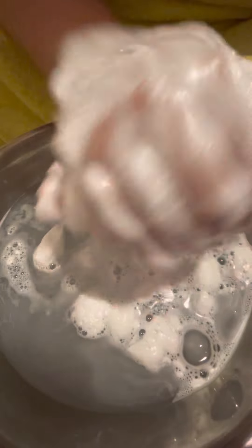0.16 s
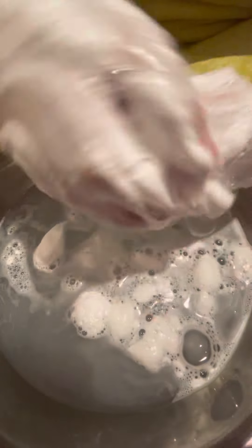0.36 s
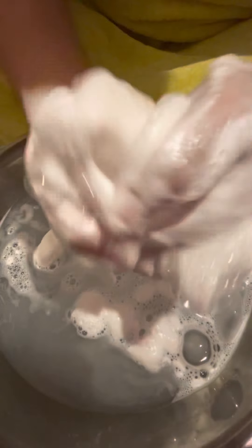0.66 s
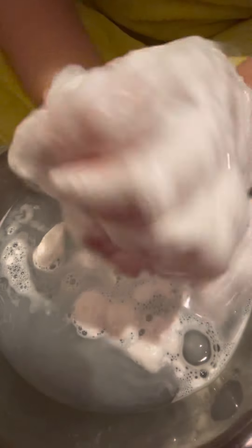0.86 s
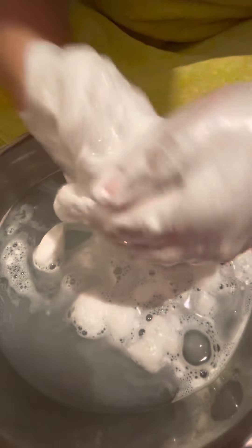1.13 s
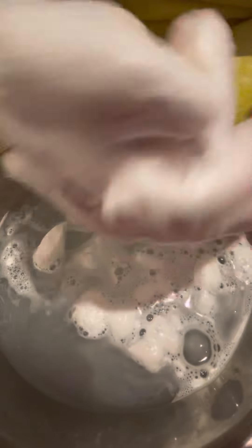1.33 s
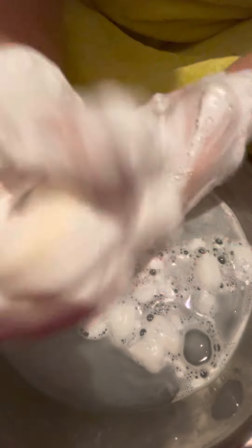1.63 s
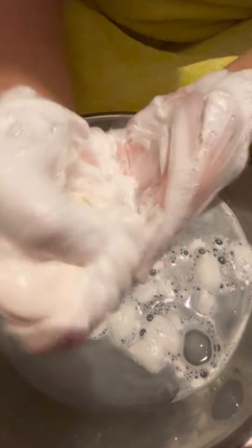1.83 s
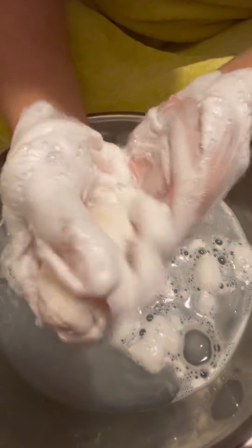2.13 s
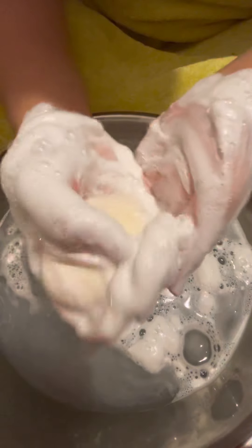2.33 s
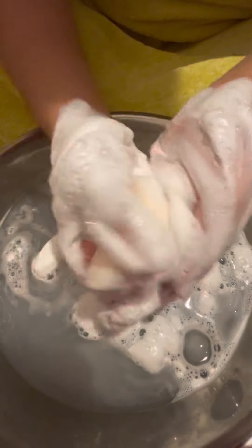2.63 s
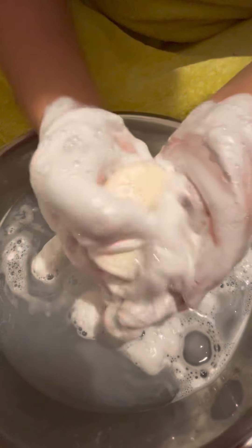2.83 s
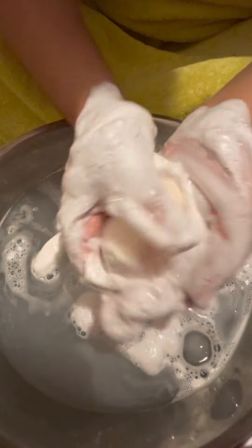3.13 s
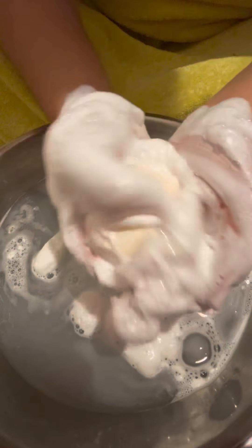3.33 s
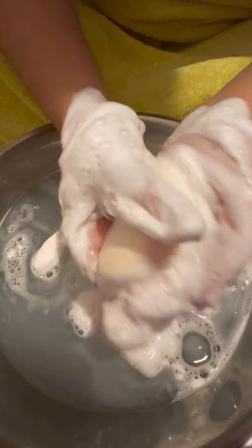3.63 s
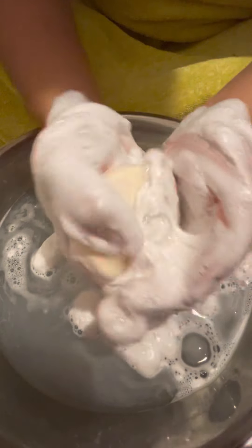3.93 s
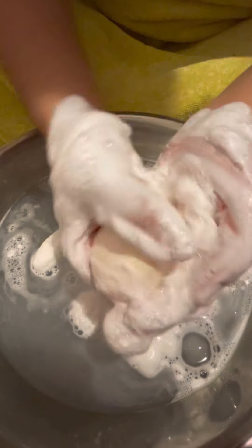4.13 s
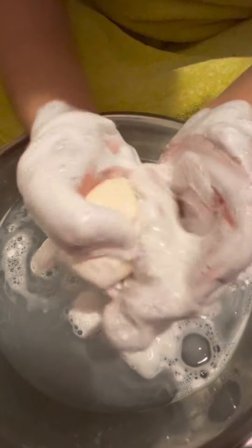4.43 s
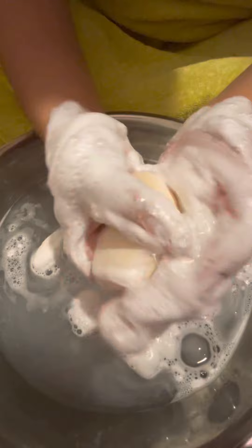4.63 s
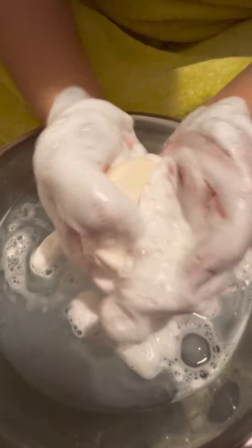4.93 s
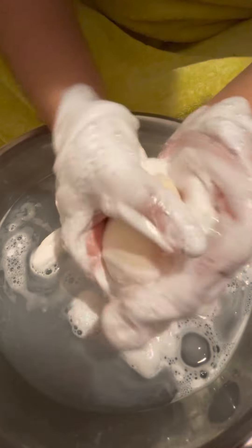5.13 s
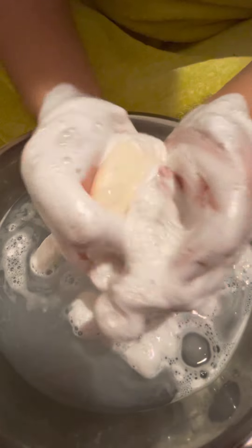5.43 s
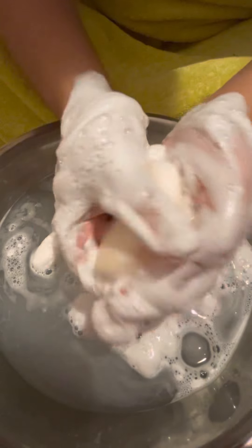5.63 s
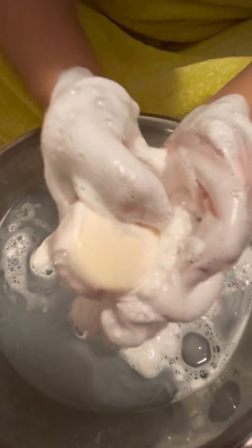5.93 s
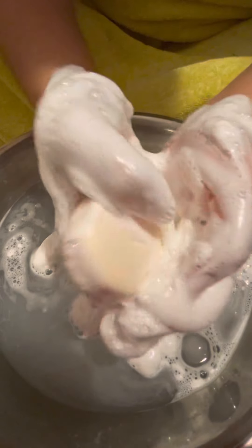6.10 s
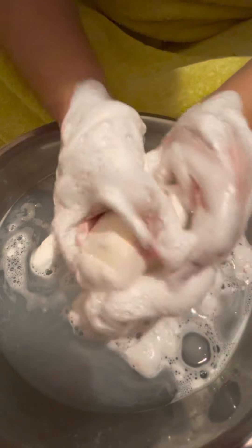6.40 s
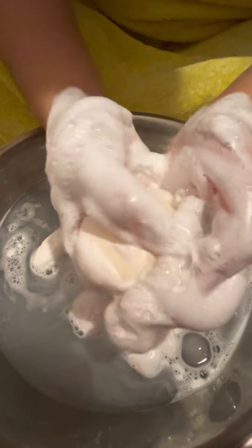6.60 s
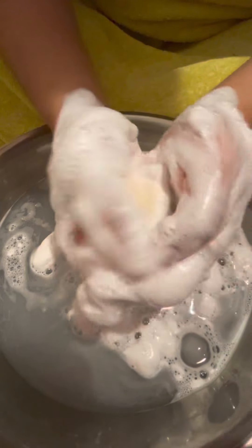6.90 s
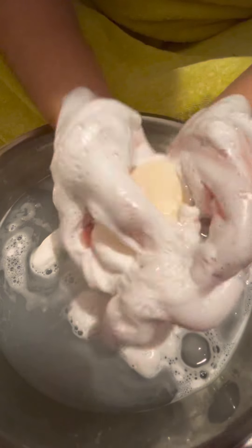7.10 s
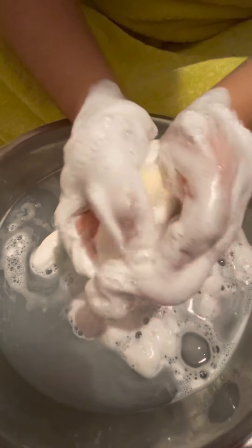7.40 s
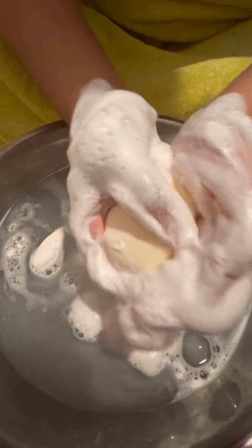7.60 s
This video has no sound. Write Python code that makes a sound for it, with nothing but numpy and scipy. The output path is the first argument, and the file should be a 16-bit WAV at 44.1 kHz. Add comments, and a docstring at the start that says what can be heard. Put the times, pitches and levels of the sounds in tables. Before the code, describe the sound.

Very close to the microphone, two lathered hands knead a wet bar of soap over a metal bowl. Sparse, faint bubble pops come first; from about two and a half seconds, hollow gulps and wet squelches grow stronger, with crisp snaps in irregular clusters. Fine foam crackle whispers underneath, the bowl adds only a very short reflection, and a soft low rumble fills the quiet room.

```python
"""In a quiet room, close to a phone with two microphone ports, two hands knead a wet bar of soap.
Collapsing air pockets snap as falling sine bursts, and the hollow between the palms gulps as a brief resonance.
Hard squeezes are volleys of bursts with a spit of noise; foam is a random crackle over a noise whisper.
A steel bowl below answers as a short tail of decaying noise.
A low rumble is noise with wavering bands, and soft sinking tones murmur."""
import sys
import numpy as np
from scipy import signal
from scipy.fft import rfft, irfft, next_fast_len
from scipy.io import wavfile
from scipy.ndimage import uniform_filter1d, map_coordinates

SR = 44100
rng = np.random.default_rng(int(sys.argv[2]) if len(sys.argv) > 2 else 0)


def transcribe(u):
    """Save the signal u as a 16-bit wav file named by the first command-line argument.

    u: samples, shape (n,) or (channels, n), limited to [-1, 1]; the rate is SR.
    q: integer samples, one column per channel.
    """
    v = np.clip(np.atleast_2d(u).T, -1, 1)
    q = np.round(v * 32767).astype(np.int16)
    wavfile.write(sys.argv[1], SR, q)


N = 341775

# air pockets bursting: peak_s, collapse_db, starting_pitch_hz, film_spray_db
POCKET_BURSTS = [(0.142, -35, 2900, -41.5), (0.18, -38, 1980.0, -61.5), (0.265, -42.5, 1240, -75),
                 (0.362, -44, 1297, -55.5), (0.483, -45.5, 1930, -53), (0.63, -42, 2890.0, -59),
                 (0.73, -41, 2100, -40), (0.7469, -32.5, 2480, -42), (0.994, -39.5, 2860, -57),
                 (1.073, -40.5, 2470, -84), (1.146, -41, 2400, -79), (1.255, -34, 3090, -50),
                 (1.302, -41.5, 4000, -48.5), (1.36, -40, 2950, -61), (1.474, -44.5, 3950, -54),
                 (1.813, -36, 1550, -57.5), (2.116, -45.5, 3080, -43.5), (2.24, -44, 1720, -56),
                 (2.253, -37.5, 1610, -53), (2.276, -38, 1770, -65), (2.663, -34.5, 2520, -78.5),
                 (2.841, -23.5, 2010, -71), (2.919, -23.5, 2610, -27.5), (2.968, -33, 3100, -56.5),
                 (3.106, -38, 2700, -44.5), (3.17, -35.5, 3320, -38.5), (3.363, -33, 2360.0, -27.5),
                 (3.413, -37, 3000, -41), (3.449, -41, 2600.0, -50.5), (3.469, -45, 2650, -52),
                 (3.717, -30.5, 1700.0, -49.5), (4.148, -39.5, 3880, -39.5), (4.303, -41, 4400, -48.5),
                 (4.4965, -39.5, 1860, -55), (4.618, -32.5, 2680, -35), (4.629, -34, 2400, -45),
                 (4.718, -42, 3000, -84), (4.81, -27.5, 2880, -38.5), (4.831, -24, 3180, -32.5),
                 (4.917, -32, 2350, -49.5), (5.119, -27.5, 5330, -44.5), (5.221, -39, 1290, -55.5),
                 (5.284, -34, 2260, -54), (5.306, -33.5, 2210.0, -35), (5.463, -30.5, 3320, -33.5),
                 (5.616, -19, 2840, -47.5), (5.636, -29.5, 2480, -67.5), (5.677, -38.5, 2900, -48),
                 (5.695, -36.5, 4200, -43), (5.867, -45.5, 2880, -73), (5.894, -31, 2060, -73),
                 (6.135, -35, 1820, -70), (6.302, -35.5, 1990, -60), (6.453, -40, 1570, -61),
                 (6.592, -39, 3870, -47), (6.708, -29, 3680, -31), (6.787, -25, 4420, -29),
                 (6.875, -29.5, 4350, -41.5), (6.995, -29, 2620, -79), (7.198, -26.5, 2460, -33.5),
                 (7.254, -26, 2900, -46.5), (7.305, -37.5, 3300, -35.5), (7.329, -31.5, 2480, -50),
                 (7.361, -35.5, 3730, -40.5), (7.452, -26, 2330, -40), (7.627, -38.5, 4670, -47),
                 (7.675, -37, 2570, -57), (7.706, -19.5, 3050, -33)]
# the hollow between the palms opening: peak_s, peak_db, starting_pitch_hz
PALM_GULPS = [(0.72, -36.5, 510), (0.7334, -30, 589.5), (0.7534, -34, 600), (1.85, -43.5, 565),
              (2.118, -44, 720), (2.4515, -29.5, 630), (2.4659, -21, 626), (2.492, -23.5, 670),
              (2.816, -35, 505), (2.833, -26.5, 620), (2.8438, -24.5, 526), (2.9223, -21.5, 582),
              (3.367, -30.5, 454), (3.409, -33.5, 630), (3.7195, -37.5, 560), (4.393, -31.5, 486),
              (4.8133, -29, 580), (4.833, -28, 540), (5.326, -28.5, 534), (5.336, -25.5, 595),
              (5.345, -32, 650), (6.268, -42, 666), (7.184, -29, 560), (7.2, -30, 448),
              (7.2104, -29.5, 750), (7.222, -36, 427), (7.455, -35.5, 346), (7.708, -26, 587.5)]
# hard squeezes: start_s, length_s, and the mean levels of the snaps and the spit: body_db, spit_db
HARD_SQUEEZES = [(0.096, 0.026, -53.5, -62), (0.546, 0.03, -54.5, -61), (0.715, .059, -50.5, -76),
                 (1.83, 0.023, -52.5, -59.5), (2.414, 0.12, -50.5, -69), (2.442, 0.01, -31.5, -45),
                 (2.459, 0.0071, -22.5, -40.5), (2.469, 0.011, -23, -48), (2.478, 0.031, -45, -56.5),
                 (2.795, 0.056, -51, -65.5), (2.887, 0.015, -44.5, -93), (3.363, 0.033, -54, -41.5),
                 (3.396, 0.013, -43.5, -56.5), (3.823, 0.025, -62, -65), (4.358, 0.078, -46.5, -49.5),
                 (4.788, 0.067, -46.5, -65), (5.321, 0.024, -31.5, -36.5), (5.746, .014, -43.5, -52.5),
                 (6.765, 0.036, -48.5, -46), (7.164, 0.0281, -49, -70), (7.192, 0.035, -44, -46.5),
                 (7.444, .016, -41.5, -50), (7.697, 0.051, -43, -53)]
# bright snaps of single bubbles: peak_s, reference_db (snap and spray lie below it)
SINGLE_SNAPS = [(0.6569, -38), (0.9627, -49), (1.1666, -64), (1.216, -49), (1.3906, -48.5), (2.0842, -39.5),
                (2.7556, -54.5), (2.7924, -40), (3.035, -45.5), (3.0824, -44), (3.1469, -35),
                (3.1844, -42.5), (3.2487, -51), (3.5871, -48.5), (3.6431, -47), (3.6625, -35),
                (3.6858, -41), (3.9489, -46.5), (3.9939, -50.5), (4.2768, -52), (4.3145, -47.5),
                (4.563, -40), (4.596, -39), (4.7501, -41.5), (5.145, -37.5), (5.8404, -50.5),
                (6.1399, -41.5), (6.2857, -45), (6.5091, -41), (7.6102, -46)]
# course of the kneading, which guides whisper and crackle: time_s, reference_db
KNEADING = [(0, -73), (0.3, -80), (0.71, -72), (1.25, -75), (1.7, -86), (2.3, -78), (3, -69), (3.4, -79),
            (4.08, -84), (4.5, -72), (5.25, -78), (5.55, -68), (5.76, -68), (5.93, -86), (6.5, -81.5),
            (6.85, -68), (7.35, -68), (7.5, -77.5)]
# relative spectrum of the foam's whisper: frequency_hz, level_db
WHISPER_SPECTRUM = [(250, -20), (600, -1), (2000, 0), (4000, -7), (6400, -7), (8200, -16), (10800, -9),
                    (12500, -37), (15000, -52)]
# relative spectrum of air spat through foam and of torn films: frequency_hz, level_db
SPIT_SPECTRUM = [(1500, -16), (3500, -4), (6000, -1), (8200, -3), (10800, 2), (12000, -11), (13200, -30),
                 (15800, -54)]
# decay of the steel bowl's answer: frequency_hz, t60_s
BOWL_DECAY = [(400, 0.1), (1800, 0.025), (5000, 0.034), (12000, 0.023)]
# course of the room's rumble: time_s, level_db
RUMBLE_COURSE = [(0, -61.5), (0.8, -61), (2.1, -61), (3.28, -61.5), (4.1, -68.5), (5.35, -53.5), (5.9, -58),
                 (6.3, -62.5), (7.08, -56), (7.75, -59)]
# relative spectrum of the rumble: frequency_hz, level_db
RUMBLE_SPECTRUM = [(30, -43), (42, -4), (58, 3.5), (75, -4.5), (120, -12), (200, -13.5), (330, -28),
                   (700, -38.5), (1200, -120)]
# soft sinking tones, before their random wavering: start_s, length_s, starting_pitch_hz, level_db
SOFT_TONES = [(2.516, 0.3, 424, -76.5), (5.498, .48, 178, -66.5)]
# phase of the left port ahead of the right: frequency_hz, lead_rad
PORT_LEAD = [(0, 0), (520, -.1), (860, .6), (1500, .1), (4400, 1.4), (5250, 4.6), (5600, 6), (8010, 9.1),
             (9600, 9.4), (12000, 12.5), (14000, 12.8)]
# level of the left port over the right: frequency_hz, lean_db
PORT_LEAN = [(100, -.6), (300, -3.8), (600, -5.5), (1200, 1.2), (2800, -2), (9000, 0)]

KNOCK_DB, KNOCK_CAP_DB = -15, -29.5  # mean knock relative to its pop; louder pops knock no harder than the cap
CRACKLE_DB = -70.5  # small bubbles at the mean kneading level
CRACKLE_GROWTH, CRACKLE_CROWDING = 0.38, 0.92  # dB louder and dB denser per dB of kneading
BAND_LIMIT_HZ = 15700


def amp(db):
    """Level and amplitude: 20 dB is a factor of ten."""
    return 10 ** (np.asarray(db) / 20)


def unit(x):
    """Normalisation: the whole array is brought to an rms of 1."""
    return x / np.sqrt(np.mean(x ** 2) + 1e-20)


def along(points, hz):
    """Logarithmic frequency scale: the second column interpolated at hz."""
    f, v = np.transpose(points)
    return np.interp(np.log(hz + 1), np.log(f + 1), v)


def curve(rows):
    """Linear interpolation: one value per sample from (s, value) rows."""
    return np.interp(np.arange(N) / SR, *np.transpose(rows))


def wobble(rate_hz):
    """Slow random modulation: a smooth curve through rate_hz random knots a second."""
    knots = rng.standard_normal(int(N * rate_hz / SR) + 4)
    return map_coordinates(knots, [np.arange(N) * rate_hz / SR])


def filtered(x, response):
    """Linear filtering: the spectrum of x times a complex response of frequency."""
    m = next_fast_len(N + 8192)
    hz = np.fft.rfftfreq(m, 1 / SR)
    return irfft(rfft(x, m) * response(hz), m)[..., :N]


def hiss(spectrum, channels=1):
    """Coloured noise: white noise shaped by a spectrum, with an rms of 1."""
    white = rng.standard_normal((channels, N))
    return unit(filtered(white, lambda hz: amp(along(spectrum, hz))))


def bubbles(peak_s, db, hz, cycles, fall, size):
    """Bubble oscillation: sine bursts swell for some cycles and fade; pitch sinks towards (1 - fall) * hz."""
    u = hz[:, None] * np.arange(size) / SR / cycles  # time in units of the rise
    phase = cycles * (u * (1 - fall) + fall * 2 * (1 - np.exp(-u / 2)))
    envelope = (u * np.exp(1 - u)) ** 2
    wave = np.sin(2 * np.pi * phase) * amp(db)[:, None] * envelope
    start = np.maximum((peak_s - cycles / hz) * SR, 0).astype(int)
    at = start[:, None] + np.arange(size)
    return np.bincount(at.ravel(), wave.ravel(), N + size)[:N]


def puffs(peak_s, db, rise_s):
    """Turbulent noise: bursts of bright hiss swell for rise_s up to peak_s and fade."""
    u = np.arange(500) / SR / rise_s
    start = np.maximum((peak_s - rise_s) * SR, 0).astype(int)
    kicks = np.bincount(start, amp(db), N)
    envelope = np.convolve(kicks, (u * np.exp(1 - u)) ** 2)[:N]
    return envelope * hiss(SPIT_SPECTRUM)[0]


def pops():
    """Cavity collapse: a falling snap, a neighbour just before or after, film spray and a late palm knock."""
    s, db, hz, spray_db = np.transpose(POCKET_BURSTS)
    chance = rng.standard_normal((len(s), 5))
    snap = bubbles(s, db, hz, cycles=0.92, fall=0.57, size=500)

    beside_s = np.clip(s + 0.003 * chance[:, 2], 0, s[-1])
    beside_db = -10 + 3 * chance[:, 3]  # relative to the pop
    beside_hz = 0.65 * hz * np.exp(0.37 * chance[:, 4])
    neighbour = bubbles(beside_s, db + beside_db, beside_hz, cycles=1.79, fall=0.33, size=500)

    knock_db = KNOCK_DB + np.minimum(db, KNOCK_CAP_DB) + 3 * chance[:, 0]
    knock_hz = 560 * np.exp(0.25 * chance[:, 1])
    knock = bubbles(s + 0.002, knock_db, knock_hz, cycles=1.203, fall=0.021, size=900)

    spray = puffs(s, spray_db, rise_s=0.00097)
    spray += puffs(beside_s, spray_db + beside_db, rise_s=0.0012)
    return snap + neighbour + knock + spray


def gulps():
    """Cavity resonance: the air between the palms rings for a handful of cycles."""
    s, db, hz = np.transpose(PALM_GULPS)
    return bubbles(s, db, hz, cycles=1.14, fall=0.1, size=1600)


def squeezes(count=1300):
    """Forced flow: air driven out between soap and skin gives a dense volley of wet snaps and a lumpy spit."""
    t = np.arange(N) / SR
    body, spit = np.zeros(N), np.zeros(N)
    for s, length, body_db, spit_db in HARD_SQUEEZES:
        onset = np.clip((t - s) / 0.0016, 0, 1)
        release = np.clip((s + length - t) / 0.0022, 0, 1)
        body += amp(body_db) * onset * release
        spit += amp(spit_db) * onset * release

    # snaps fall at random within the time under pressure
    pressed = np.cumsum(body > 0)
    u = rng.random((count, 3))
    snap_s = np.interp(u[:, 0], pressed / pressed[-1], t)
    size_db = -3.5 * np.log(u[:, 1] + 0.077) - 3 * u[:, 2]  # the higher snaps are weaker
    snap_hz = 800 * 5.57 ** u[:, 2]
    volley = bubbles(snap_s, size_db, snap_hz, cycles=0.96, fall=0.12, size=700)

    # wet pockets that ring on and rise
    wet_s = snap_s[::4]
    wet_hz = 520 * 5 ** rng.random(len(wet_s))
    volley += bubbles(wet_s, size_db[::4], wet_hz, cycles=2.5, fall=-0.2, size=1500)
    volley /= np.std(volley[body > 0])

    lumps_db = 3 * wobble(140) + 2.5 * wobble(500)
    return body * amp(3.6 * wobble(90)) * volley + spit * amp(lumps_db) * hiss(SPIT_SPECTRUM)[0]


def ticks():
    """Single-bubble collapse: one short cycle and a thin spray."""
    s, db = np.transpose(SINGLE_SNAPS)
    hz = 3000 * np.exp(0.23 * rng.standard_normal(len(s)))
    snap = bubbles(s, db - 5.5, hz, cycles=1.12, fall=0.33, size=300)
    return snap + puffs(s, db - 2, rise_s=0.0004)


def foam(count=320):
    """Random point process: clumped bubbles break more often in busy kneading, over a whisper of tiny ones."""
    knead_db = curve(KNEADING)
    swing_db = knead_db - knead_db.mean()
    clump = wobble(28)
    chance = np.cumsum(amp(CRACKLE_CROWDING * swing_db + 5 * clump))
    u = rng.random((count, 4))
    s = np.interp(u[:, 0], chance / chance[-1], np.arange(N) / SR)
    db = -4.5 * np.log(u[:, 1] + 0.019)  # many weak bubbles, few strong
    hz = 800 * 6 ** u[:, 2]
    snaps = unit(bubbles(s, db, hz, cycles=1.09, fall=0.5, size=300))
    spray = unit(puffs(s, db + 12 * u[:, 3], rise_s=0.00021))
    crackle = amp(CRACKLE_DB + CRACKLE_GROWTH * swing_db) * (snaps + amp(-0.5) * spray)
    # two independent noises: one joins the hands, the other is added equally to both ports
    whisper = hiss(WHISPER_SPECTRUM, channels=2) * amp(knead_db + 2.5 * clump - 0.5)
    return crackle, whisper


def bowl(x):
    """Reverberant decay: each frequency of the answer dies at its own speed, differently at each port."""
    hz, t, z = signal.stft(rng.standard_normal((2, SR // 5)), SR, nperseg=128)
    decay_db = -60 * t / along(BOWL_DECAY, hz)[:, None]
    tail = signal.istft(z * amp(decay_db), SR, nperseg=128)[1]
    tail /= np.linalg.norm(tail[0])
    delayed = np.pad(x, (90, 0))  # samples, about 2 ms
    return signal.fftconvolve(delayed[None], tail, axes=1)[:, :N]


def rumble():
    """Narrow-band fluctuation: bands of low noise swell and fade, nearly the same at both ports."""
    z = signal.stft(hiss(RUMBLE_SPECTRUM, channels=2), nperseg=4096)[2]
    bands_db = 3.5 * unit(uniform_filter1d(rng.standard_normal(z.shape[1:]), size=8, axis=1))
    mid, side = unit(signal.istft(z * amp(bands_db), nperseg=4096)[1][:, :N])
    side = amp(-12.5) * side
    return amp(curve(RUMBLE_COURSE)) * np.array([mid + side, mid - side])


def murmurs():
    """Frequency and amplitude modulation: random wavering blurs soft tones that sink in pitch."""
    t = np.arange(N) / SR
    out = np.zeros(N)
    for s, length, hz, db in SOFT_TONES:
        u = np.clip((t - s) / length, 0, 1)
        pitch_hz = hz * (1 - 0.07 * u + 0.04 * wobble(130))
        tone = np.sin(2 * np.pi * np.cumsum(pitch_hz) / SR)
        swell = np.sqrt(np.abs(np.sin(np.pi * u))) * (u < 1)
        out += amp(db + 5 * wobble(40)) * swell * tone
    return out


def at_ports(hands):
    """Interaural-style differences: the ports differ in level and phase at each frequency."""
    sides = np.array([[0.5], [-0.5]])  # left and right share each difference

    def response(hz):
        level = amp(sides * along(PORT_LEAN, hz))
        lead = np.exp(1j * sides * np.interp(hz, *np.transpose(PORT_LEAD)))
        dip = 1 - 0.7 * np.exp(-((hz - 820) / 130) ** 2)  # a hollow in the colour above the palms' ring
        return level * lead * dip

    return filtered(hands, response)


def scene():
    """Superposition: the hands at both ports, their answer from the bowl, and the room."""
    crackle, whisper = foam()
    hands = pops() + gulps() + squeezes() + ticks() + crackle + whisper[0]
    near = at_ports(hands) + amp(-9.5) * whisper[1]
    return near + amp(-9) * bowl(hands) + rumble() + murmurs()


def record(dry):
    """Band limitation: the microphone fades in the top treble; the phone keeps nothing above its limit."""
    return filtered(dry, lambda hz: (hz < BAND_LIMIT_HZ) / (1 + (hz / 14500) ** 10))


dry = scene()
out = record(dry)
transcribe(out)
```